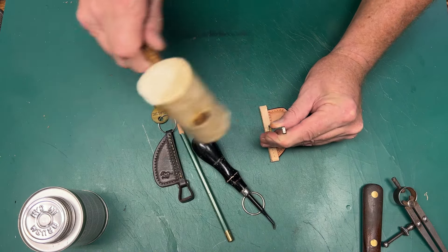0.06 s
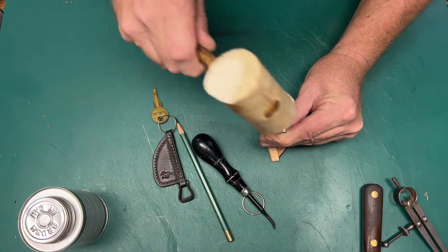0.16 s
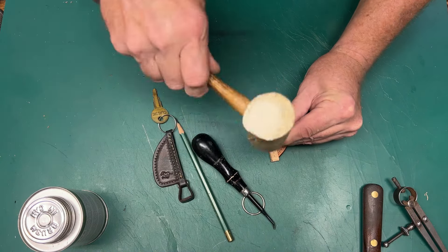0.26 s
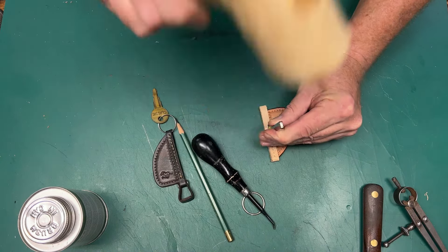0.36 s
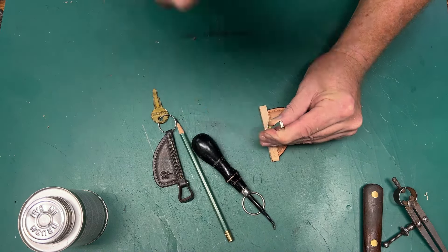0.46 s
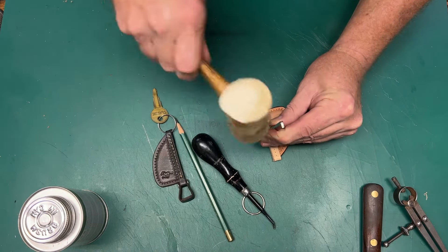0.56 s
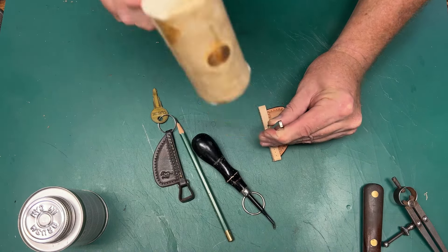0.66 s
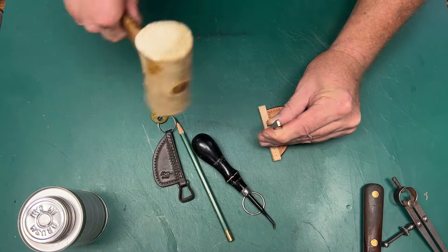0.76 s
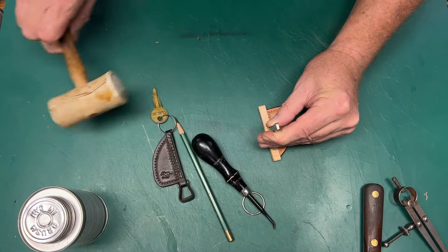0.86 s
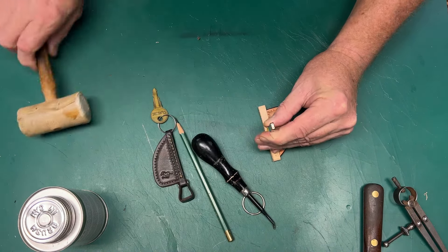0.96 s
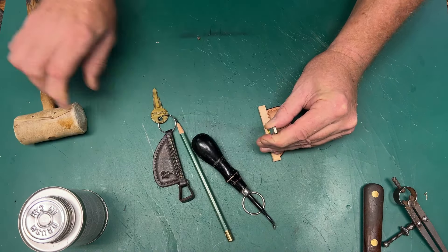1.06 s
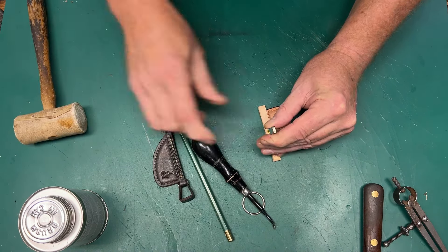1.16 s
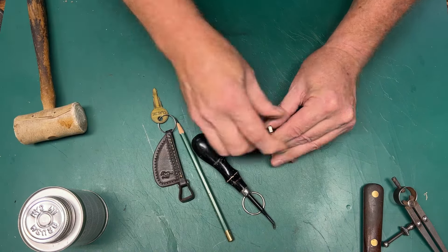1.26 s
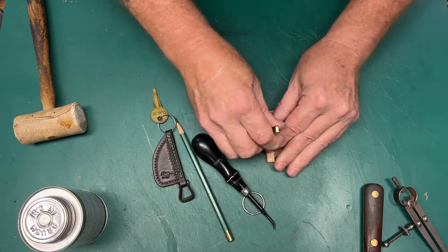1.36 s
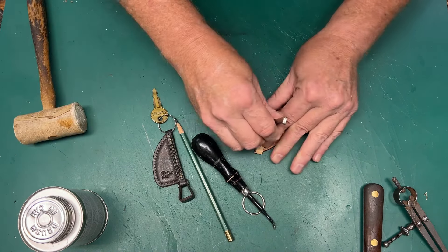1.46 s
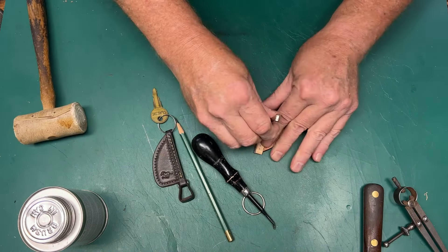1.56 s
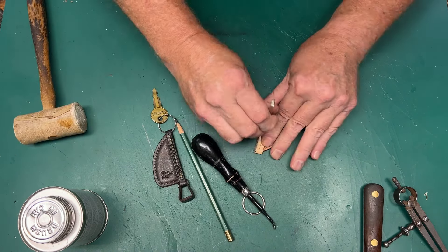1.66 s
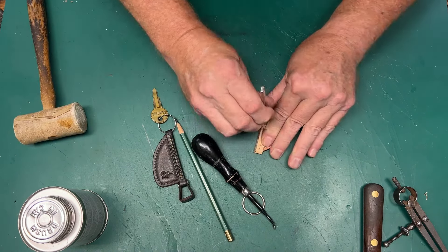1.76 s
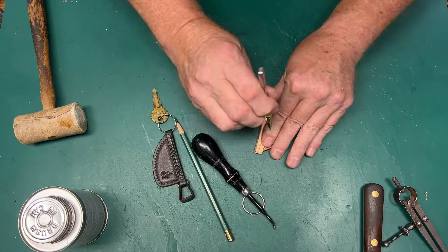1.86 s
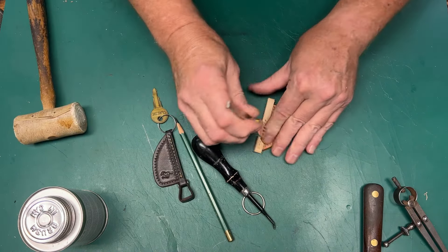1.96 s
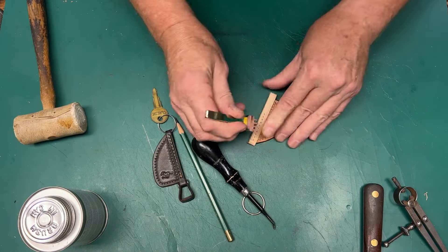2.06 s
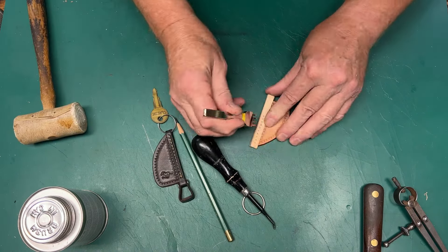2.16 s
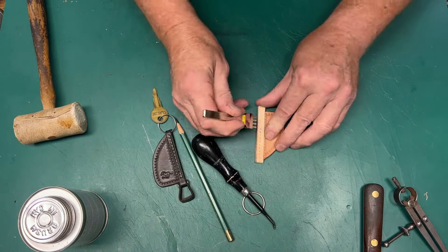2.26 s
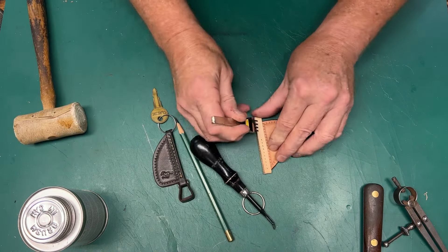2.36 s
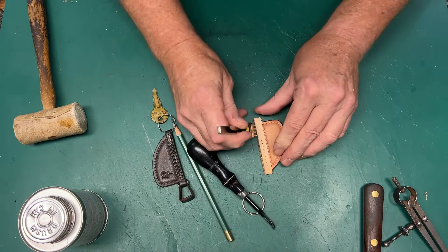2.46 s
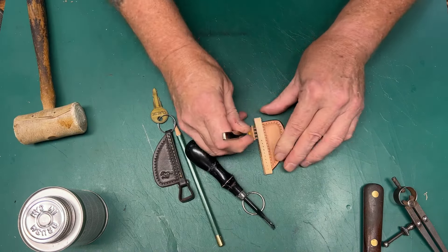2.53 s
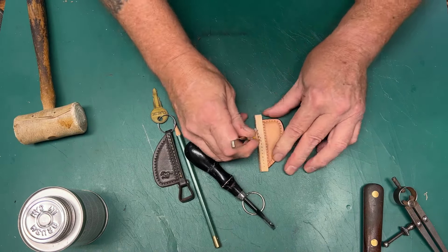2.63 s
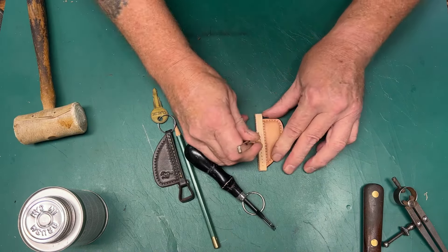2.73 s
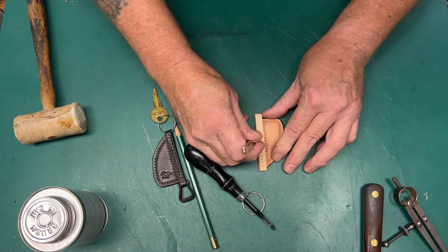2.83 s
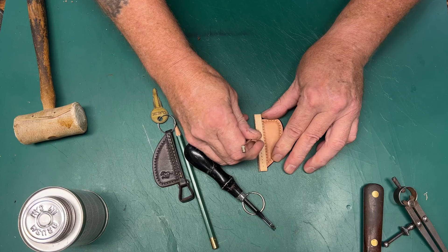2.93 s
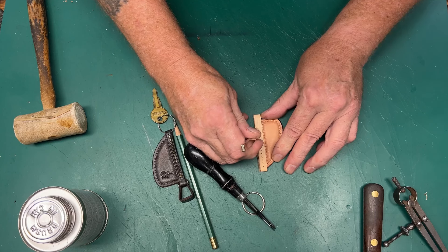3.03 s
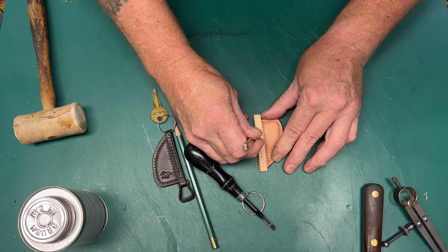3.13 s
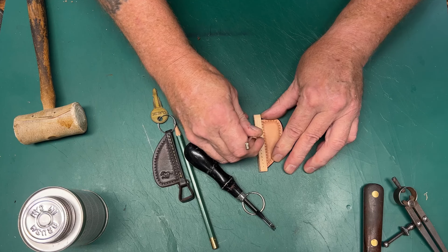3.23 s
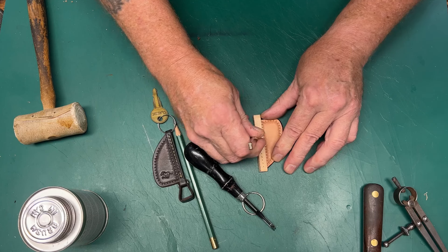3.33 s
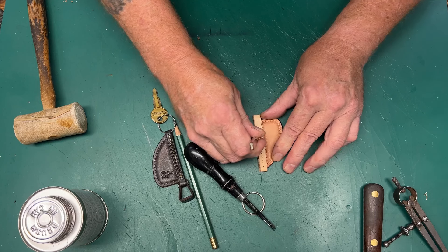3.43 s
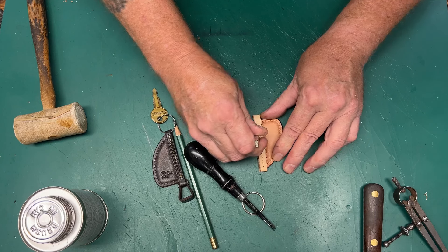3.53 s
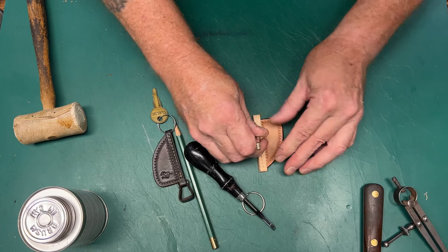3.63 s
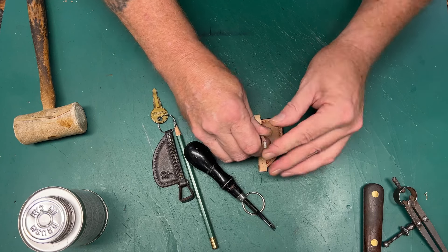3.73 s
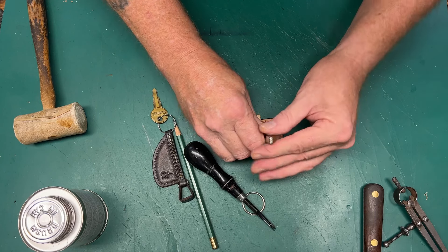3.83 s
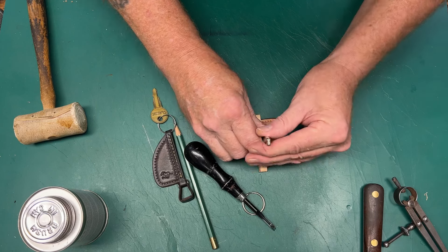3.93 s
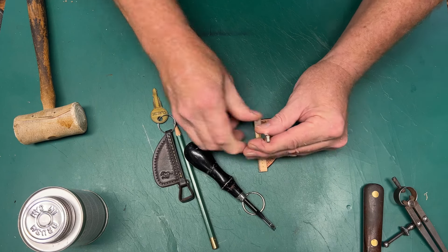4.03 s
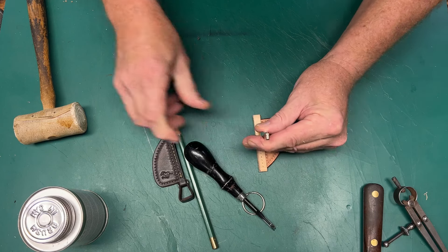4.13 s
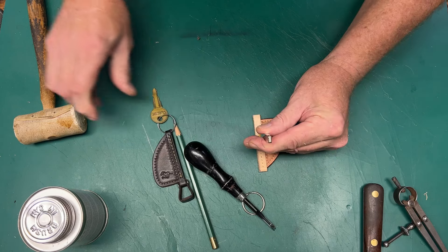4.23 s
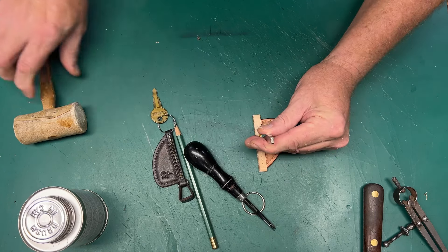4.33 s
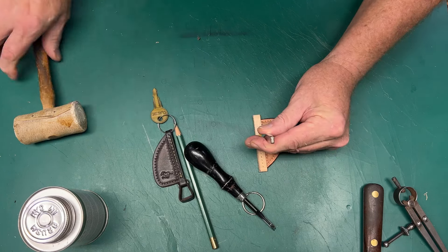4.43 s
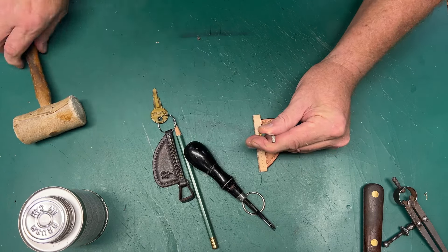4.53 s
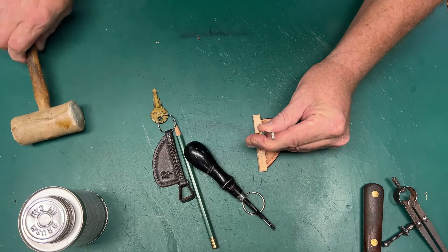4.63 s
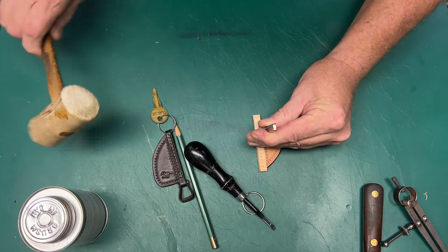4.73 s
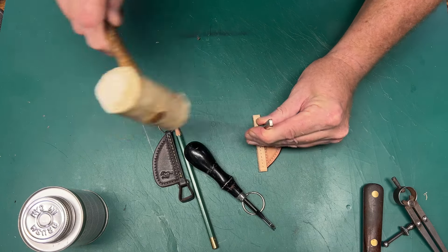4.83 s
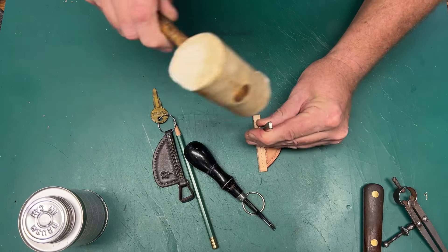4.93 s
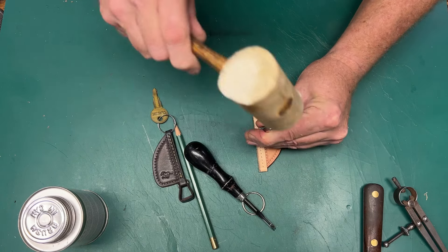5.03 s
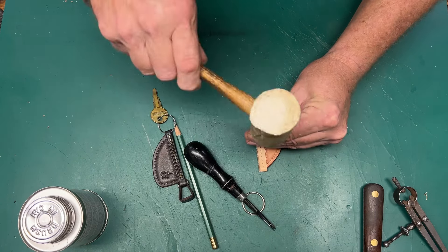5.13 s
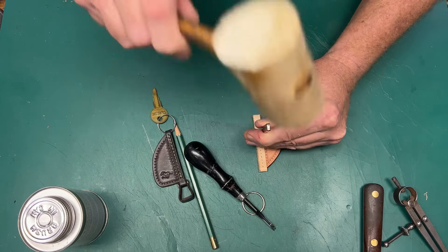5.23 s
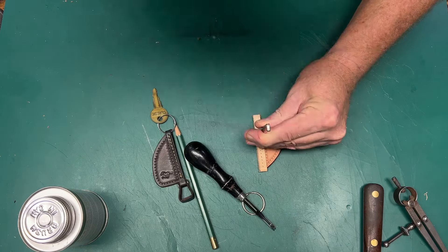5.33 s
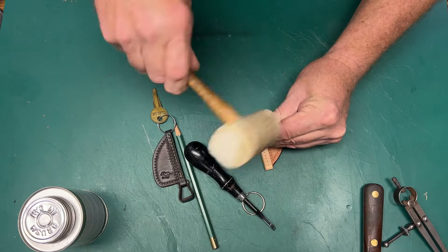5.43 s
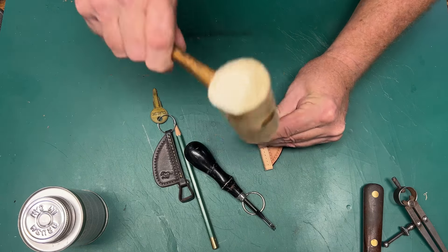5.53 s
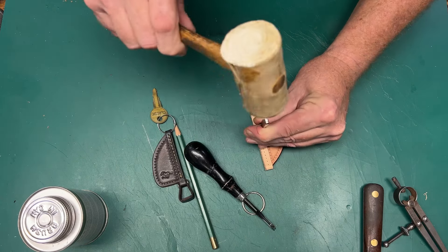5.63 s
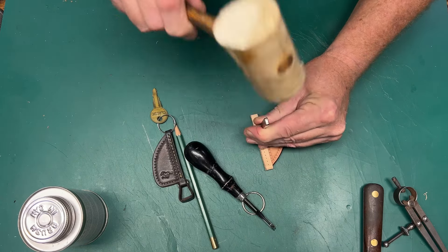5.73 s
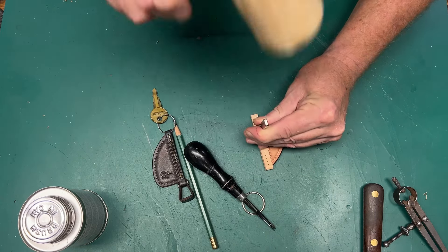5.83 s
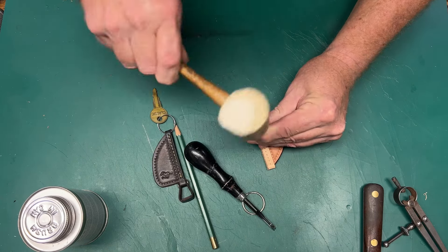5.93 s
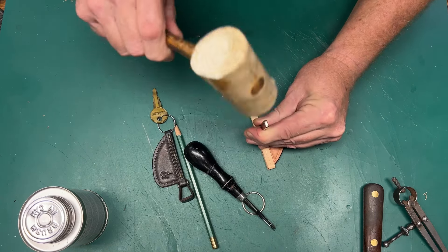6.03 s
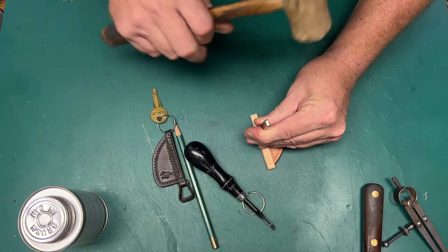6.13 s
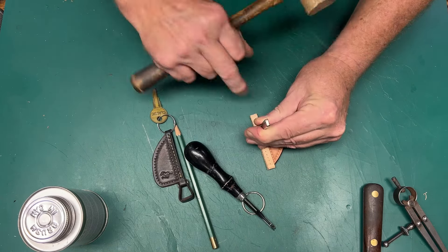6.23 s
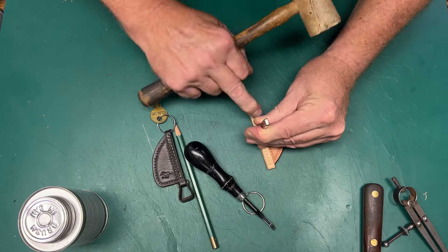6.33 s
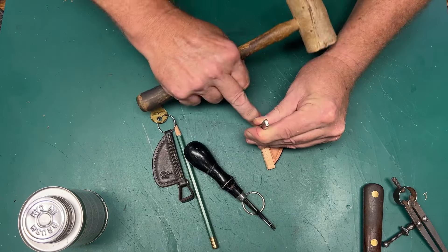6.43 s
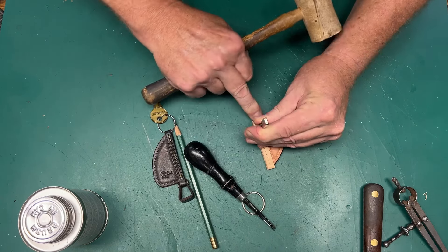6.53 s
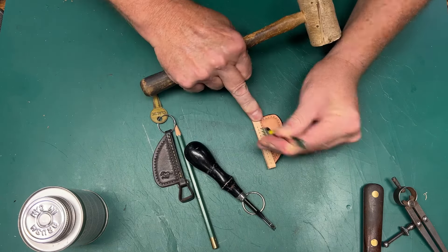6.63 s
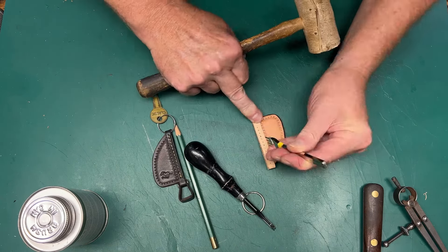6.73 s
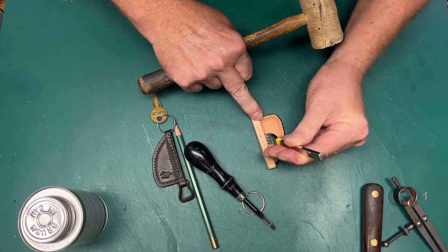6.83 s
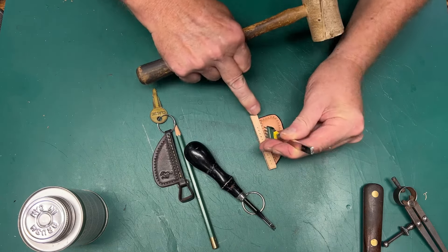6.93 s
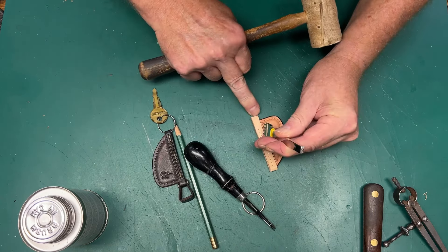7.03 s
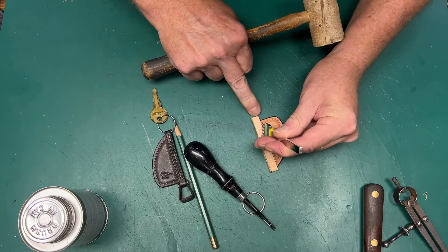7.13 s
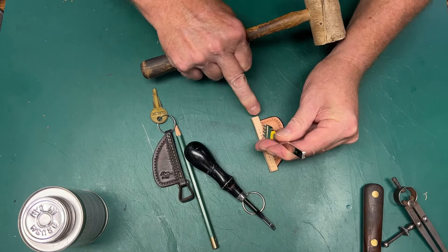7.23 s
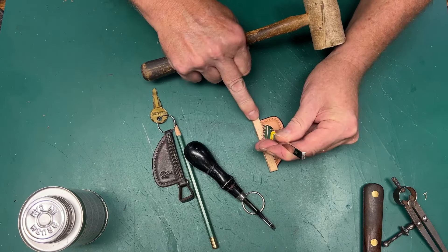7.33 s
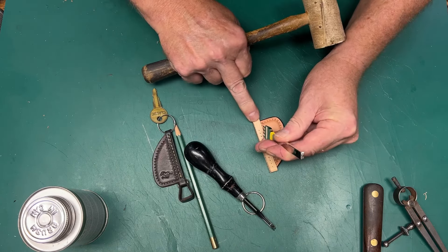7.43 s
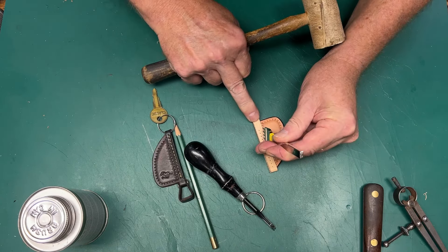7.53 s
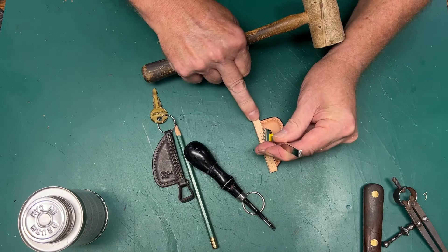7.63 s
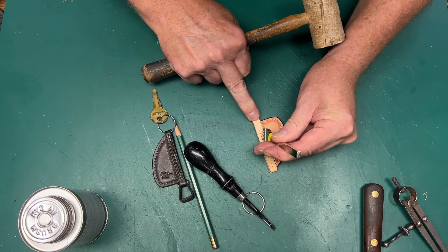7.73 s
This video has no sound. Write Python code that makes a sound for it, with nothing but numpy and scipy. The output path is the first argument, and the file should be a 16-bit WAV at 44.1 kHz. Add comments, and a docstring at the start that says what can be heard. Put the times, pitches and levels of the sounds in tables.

```python
"""Punching leather at the workbench

A close stereo microphone in a small room, over a low hum. A rawhide mallet drives a steel stitching
iron through leather: two knocks, the mallet clatters down on the left, fingers shift the leather and
reset the iron; three more knocks, and the iron is drawn out. Each knock rings mallet, iron and wooden
bench, and the hardest briefly push the microphone's limiter down."""
import sys
import numpy as np
from scipy import signal
from scipy.fft import rfft, irfft
from scipy.io import wavfile
from scipy.ndimage import uniform_filter1d, minimum_filter1d

SR = 44100
rng = np.random.default_rng(int(sys.argv[2]) if len(sys.argv) > 2 else 0)


def pcm_store(signal):
    """Save signal as 16-bit PCM."""
    levels = np.round(np.clip(np.atleast_2d(signal), -1, 1) * 32767)
    wavfile.write(sys.argv[1], SR, levels.astype(np.int16).T)


N = 343098
TIME, FREQS = np.arange(N) / SR, np.fft.rfftfreq(N, 1 / SR)
RING_TIME = np.arange(SR * 3 // 4) / SR

# Levels are relative, ahead of the mix gains.
# Mains hum of a distant motor. Each row: frequency in Hz, level in dB.
MOTOR_HUM = [(59.5, -64.5), (119.5, -57.5), (236, -75)]
# The room's decay. Each row: frequency in Hz, seconds to fall 60 dB.
ROOM_T60 = [(100, 0.9), (300, .55), (700, 0.5), (2000, 0.55), (5000, 0.45), (9000, 0.43), (15000, 0.21)]
# Strength of the reflections. Each row: frequency in Hz, level in dB.
ROOM_DB = [(60, -17), (200, -13.5), (400, -9), (800, -5.5), (1700, -9.5), (3000, -9), (6000, -6),
           (9000, -12.5), (14000, -15.5)]
# Diffuse sound at the microphone. Each row: frequency in Hz, left-right likeness from 0 to 1.
COHERENCE = [(60, 1), (250, 0.64), (600, 0.33), (1500, 0.24), (4000, .1), (16000, .05)]
# Spectra of noises and contacts. Each row: frequency in Hz, spectral density in dB.
AIR_SPECTRUM = [(20, -27), (40, -16), (60, 0.5), (80, -6), (100, -9.5), (125, -10.5), (160, -11),
                (210, -14.5), (400, -18), (1000, -28.5), (2000, -36.5), (4000, -49.5), (8000, -52),
                (16000, -70)]
RUMBLE_SPECTRUM = [(20, -26.5), (40, -13), (58, 2.5), (85, -8), (130, -13), (300, -23), (1000, -35.5),
                   (4000, -56)]
LEATHER_SPECTRUM = [(600, -33), (1400, 4.5), (3000, 1.5), (6000, 4.5), (9000, 4.5), (12000, -9), (16000, 1)]
GRIP_SPECTRUM = [(600, -26), (1200, -8), (2500, -8.5), (3500, 0), (4200, -4), (5100, -7.5), (5850, -1.5),
                 (7000, -10), (9000, -12), (12000, -27.5), (16000, -25)]
CLACK_SPECTRUM = [(80, -28.5), (200, -5), (400, -0.5), (850, -7), (1200, -2), (2200, -5), (3500, -8.5),
                  (5000, -13), (6000, -10.5), (9000, -18.5), (12000, -26.5), (16000, -33.5)]
SNAP_SPECTRUM = [(200, -16), (800, 1), (2500, 2.5), (4000, -1.5), (5500, -4.5), (7000, -8), (8700, -0.5),
                 (10500, -9.5), (12000, -9), (13500, -25.5), (15500, -18.5)]
CRACK_SPECTRUM = [(100, -23), (350, -0.5), (700, 1), (1100, -3.5), (1600, -2), (2500, -3), (4000, -15),
                  (5500, -15.5), (7000, -18.5), (9000, -22), (12000, -28.5), (13500, -38.5), (15500, -33)]
# Modes of the struck parts. Each row: frequency in Hz, level in dB, seconds to fall 60 dB.
BENCH_MODES = [(62, -19.5, 0.21), (88, -11.5, .12), (108.7, -21.5, 0.27), (134.9, -11.5, 0.19),
               (214.5, -26.5, .14), (229.9, -14.5, 0.17), (283.2, -19, 0.18), (334.7, -18.5, 0.3),
               (370, -21.5, 0.044), (496, -19.5, 0.14), (619, -16.5, .05), (680, -27, 0.028),
               (792, -26.5, 0.079)]
HEAD_MODES = [(1300, -9.5, 0.012), (1477, -9, 0.023), (1656, -5, .011), (1948, -7, .017), (2360, -16, .009)]
HANDLE_MODES = [(1206, -8, 0.058), (2670, -16.5, 0.12), (3405, -4.5, 0.051), (3645, -7, 0.0067),
                (4138, -3, 0.017), (5800, -1, .028)]
IRON_MODES = [(3250, -8, .02), (3620, -2, 0.012), (4470, -6.5, 0.009), (5760, -7.5, .009),
              (6900, -12, 0.0044)]
PUNCH_MODES = [(350, -4, 0.015), (466, 1, 0.014), (910, -14, 0.025)]  # the prongs punching down
# Hand movements. Each row: time of the peak in seconds, length in seconds, level in dB.
BENCH_LEANS = [(1.8, 1.77, -57.5), (3.5, 0.96, -59), (4.7, 1.3, -60), (6.66, 0.11, -54)]
LEATHER_SLIDES = [(1.44, .14, -69), (1.61, 0.048, -71.5), (1.74, 0.065, -69.5), (1.905, .07, -72),
                  (1.98, 0.094, -71), (2.265, 0.27, -63), (2.635, 0.13, -75), (4.02, .13, -76),
                  (6.12, .18, -69.5), (6.525, 0.093, -75)]  # on the mat or along the prongs
SKIN_RUBS = [(.025, .11, -72.5), (4.275, .08, -78), (4.466, .115, -52.5), (4.612, 0.08, -58.5),
             (4.77, .18, -71), (6.42, .045, -77), (6.835, .05, -78)]  # on handle and iron
# Ticks on the leather. Each row: start in seconds, level in dB, centre in Hz, width in octaves.
LEATHER_TICKS = [(1.279, -65, 6900, 1), (1.569, -65, 7000, 1), (1.607, -62, 4970, 1),
                 (1.7107, -58.5, 3000, 0.57), (1.743, -60, 3970, 1), (1.812, -65, 6000, 1),
                 (2.1122, -56.5, 5020, 1.9), (2.3986, -58.5, 2000, 0.6), (2.5455, -54.5, 1785, 0.34),
                 (3.3157, -61.5, 2500, 0.81), (3.452, -58, 6130, 2.8), (3.586, -53, 4500, 0.88),
                 (4.2579, -56.5, 5600, 0.77), (4.9368, -62.5, 6497, 0.39), (6.711, -82, 11000, .6),
                 (6.8513, -54, 1500, 0.8), (7.357, -70.5, 5000, .6)]
# The mallet laid down or picked up. Each row: start in seconds, bench thump in dB, its tilt in dB per
# octave, handle ring in dB, clack in dB, its tilt in dB per octave.
MALLET_CONTACTS = [(0.9299, -25, 7, -51, -20.5, -5.5), (0.9924, -29, 1.5, -51, -32.5, -4.5),
                   (0.9972, -19, -1, -35.5, -16.5, -4.5), (1.0303, -17, -0.5, -13.5, -13, 1),
                   (1.0849, -21.5, 1.5, -26.5, -26.5, 1), (4.459, -33.5, 0, -53, -45.5, 0.5),
                   (4.555, -45, 1.5, -67.5, -50.5, -3.5)]
# Mallet on iron. Each row: start in seconds, bench thump in dB, its tilt (hardness) in dB per octave,
# then punch, head, iron, snap and crack in dB, crack tilt in dB per octave, brief sub-bass thud in dB.
MALLET_BLOWS = [(0.2251, -2, -1, -3.5, -0.5, -22, -24, -17, -1, -58),
                (0.523, 1, -1, -3.5, 0.5, -17, -11, -3.5, -0.5, -28.5),
                (5.0968, -2.5, -1.5, -6, -0.5, -13.5, -24, -17.5, -1, -65),
                (5.4274, 0.5, -0.5, 4.5, 1, -12.5, -13, -3, -2.5, -28.5),
                (5.8935, -1, 0, 1.5, -1, -19.5, -14.5, -1.5, -2.5, -34.5)]


def amp(db):
    """Decibels to gain."""
    return 10 ** (np.asarray(db) / 20)


def unit_rms(x):
    """Scales to rms 1."""
    return x / np.sqrt(np.mean(x ** 2) + 1e-20)


def curve_at(points, hz):
    """Reads a curve on a log-frequency axis."""
    f, value = np.transpose(points)
    return np.interp(np.log(hz + 1), np.log(f + 1), value)


def add(mix, s, sound):
    """Mixes a sound in at s seconds."""
    part = mix[round(s * SR):][:len(sound)]
    part += sound[:len(part)]


def coloured(x, spectrum):
    """Gives noise a spectrum, at rms 1."""
    return unit_rms(irfft(rfft(x) * amp(curve_at(spectrum, FREQS)), N))


def drift(rate_hz):
    """A random wander of rms 1."""
    return unit_rms(np.interp(TIME * rate_hz, np.arange(4096), rng.standard_normal(4096)))


def strokes(rows, rise_share=.45, speed_power=1.4):
    """Level over time: each movement speeds up, then slows, and loudness is a power of its speed."""
    level = np.zeros(N)
    for s, length, db in rows:
        corners = [s - rise_share * length, s, s + (1 - rise_share) * length]
        speed = np.sin(np.pi / 2 * np.interp(TIME, corners, [0, 1, 0]))
        level += amp(db) * speed ** speed_power
    return level


def ring(modes, rise_cycles, lag_cycles=0, tilt_db=0, pivot_hz=170):
    """Modes swell and die away; neighbours swing in opposite senses, so their sum peaks late."""
    out = np.zeros(len(RING_TIME))
    for k, (hz, db, t60) in enumerate(modes):
        t = np.maximum(RING_TIME - lag_cycles / hz, 0)
        swell = 1 - np.exp(-t * hz / rise_cycles)
        fade = amp(db + tilt_db * np.log2(hz / pivot_hz) - 60 * t / t60)
        out -= (-1) ** k * fade * swell * np.sin(2 * np.pi * hz * t)
    return out


def burst(colour_db, t60, rise_s=0.00035, size=8192):
    """A contact scattered over a few milliseconds, with the spectrum colour_db(hz)."""
    t, hz = RING_TIME[:size], np.fft.rfftfreq(size, 1 / SR) + 1
    onset = 1 - np.exp(-t / rise_s)
    fade = amp(-60 * t / t60) * onset
    scatter = rfft(rng.standard_normal(size) * fade)
    contact = (irfft(scatter / abs(scatter) * amp(colour_db(hz))) * onset)[:size // 2]
    return contact * np.linalg.norm(fade) / np.linalg.norm(contact)


def diffuse_noise(size):
    """Noise reaching the microphone from all sides: left and right alike in bass, apart in treble."""
    left, unrelated = rfft(rng.standard_normal((2, size)))
    likeness = curve_at(COHERENCE, np.fft.rfftfreq(size, 1 / SR))
    right = likeness * left + np.sqrt(1 - likeness ** 2) * unrelated
    return irfft(np.array([left, right]), size)


def placed(x, left_db, shadow_hz, lag_s):
    """Direct sound: lag_s later on the right, and up to left_db louder on the left above shadow_hz."""
    shade = amp(left_db / 2 * FREQS / (FREQS + shadow_hz))
    delay = np.exp(-2j * np.pi * FREQS * lag_s)
    return irfft(rfft(x) * np.array([shade, delay / shade]), N)


def room_tone(air_db=-60.5, waver=.3, wander_rad=0.77):
    """Low steady room noise and the wavering hum of a distant motor."""
    tone = amp(air_db) * coloured(diffuse_noise(N), AIR_SPECTRUM)
    for hz, db in MOTOR_HUM:
        level = amp(db) * (1 + waver * drift(rate_hz=7))
        tone += level * np.sin(2 * np.pi * hz * TIME + wander_rad * drift(rate_hz=1.5))
    return tone


def reflections(feed, gap_s=0.0035, early_db=3, early_s=0.09):
    """Dense reflections off near walls, stronger at first; each band dies at its own speed."""
    hz, t, bands = signal.stft(diffuse_noise(SR), SR, nperseg=256)
    t60 = curve_at(ROOM_T60, hz)[:, None]
    fade = amp(curve_at(ROOM_DB, hz)[:, None] - 60 * t / t60 + early_db * np.exp(-t / early_s))
    equal_energy = np.sqrt(np.log(1e6) / (t60 * SR))
    tail = signal.istft(bands * fade * equal_energy, SR, nperseg=256)[1]
    tail *= 1 - np.exp(-(np.arange(tail.shape[1]) / SR / gap_s) ** 4)
    return signal.fftconvolve(feed[None], tail, axes=1)[:, :N]


def bench_rumble():
    """The bench stirs faintly under the pressing hands."""
    return strokes(BENCH_LEANS) * coloured(rng.standard_normal(N), RUMBLE_SPECTRUM)


def friction(rows, spectrum, gain_db, clump_db, grain_db=1.0):
    """Leather or skin sliding: dense tiny slips of uneven size, clumped under each stroke."""
    slips = rng.standard_normal(N) * (rng.random(N) < .2)
    slips *= amp(grain_db * np.minimum(rng.exponential(1, N), 4))
    slips *= amp(clump_db * drift(rate_hz=130))
    return amp(gain_db) * strokes(rows) * coloured(slips, spectrum)


def ticks(t60=0.021):
    """Prongs and fingernails tick on leather: small dead clicks, each with one broad spectral hump."""
    out = np.zeros(N)
    for s, db, centre_hz, octaves in LEATHER_TICKS:
        click = burst(lambda hz: -10 * np.log10(1 + (np.log2(hz / centre_hz) / octaves) ** 4), t60)
        add(out, s, amp(db) * click)
    return out


def iron_pull(start_s=6.603, length_s=0.028, slips_per_s=4000, scrape_db=-60.5,
              thump_s=6.62, thump_db=-38):
    """The prongs scrape out of the leather; the bench bumps as the load comes off."""
    slips, size = np.zeros(N), int(length_s * SR)
    grains = rng.standard_normal(size) * (rng.random(size) < slips_per_s / SR)
    add(slips, start_s, grains * np.hanning(size))
    out = amp(scrape_db) * np.sqrt(size / N) * coloured(slips, GRIP_SPECTRUM)
    add(out, thump_s, amp(thump_db) * ring(BENCH_MODES, rise_cycles=0.53, tilt_db=-1.5))
    return out


def mallet_clatter(clack_t60=0.025, handle_room_db=-9, clack_room_db=3):
    """Soft head, then hard handle, meet the bench and bounce. Returns close sound and room feed."""
    thump, handle, clack = np.zeros((3, N))
    for s, thump_db, hard_db, handle_db, clack_db, tilt_db in MALLET_CONTACTS:
        add(thump, s, amp(thump_db) * ring(BENCH_MODES, rise_cycles=.35, tilt_db=hard_db))
        add(handle, s, amp(handle_db) * ring(HANDLE_MODES, rise_cycles=.8))
        hit = burst(lambda hz: curve_at(CLACK_SPECTRUM, hz) + tilt_db * np.log2(hz / 1000), clack_t60)
        add(clack, s, amp(clack_db) * hit)
    return thump + handle + clack, thump + amp(handle_room_db) * handle + amp(clack_room_db) * clack


def crack(tilt_db, size=512):
    """The blow as sent out into the room in all directions: one pulse of set energy."""
    hz = np.fft.rfftfreq(size, 1 / SR) + 1
    colour_db = curve_at(CRACK_SPECTRUM, hz) + tilt_db * np.log2(hz / 1000)
    pulse = np.roll(irfft(amp(colour_db)), 64)
    return 8 * pulse / np.linalg.norm(pulse)


def mallet_knocks(snap_t60=0.013, knock_room_db=-10, iron_room_db=-6, thud_hz=24, thud_t60=.09):
    """Head snaps on iron, both ring, prongs punch, the bench booms. Returns close sound and room feed."""
    close, feed = np.zeros((2, N))
    for (s, thump_db, hard_db, punch_db, head_db, iron_db,
         snap_db, crack_db, tilt_db, thud_db) in MALLET_BLOWS:
        head = amp(head_db) * ring(HEAD_MODES, rise_cycles=0.94)
        punch = amp(punch_db) * ring(PUNCH_MODES, rise_cycles=0.59, lag_cycles=0.65)
        iron = amp(iron_db) * ring(IRON_MODES, rise_cycles=0.98)
        boom = amp(thump_db) * ring(BENCH_MODES, rise_cycles=0.98, tilt_db=hard_db)
        sub_thud = ring([(thud_hz, thud_db, thud_t60)], rise_cycles=.2)  # under the hardest knocks
        add(close, s, head + punch + iron + boom + sub_thud)
        add(close, s, amp(snap_db) * burst(lambda hz: curve_at(SNAP_SPECTRUM, hz), snap_t60))
        add(feed, s, amp(knock_room_db) * (head + punch) + amp(iron_room_db) * iron + boom)
        add(feed, s, amp(crack_db) * crack(tilt_db))
    return close, feed


def scene():
    """The work lies straight in front of the microphone; the mallet rests off to the left."""
    knocks, knocks_feed = mallet_knocks()
    clatter, clatter_feed = mallet_clatter()
    leather = friction(LEATHER_SLIDES, LEATHER_SPECTRUM, gain_db=0.5, clump_db=1.5)
    skin = friction(SKIN_RUBS, GRIP_SPECTRUM, gain_db=-4.0, clump_db=2.0)
    hands = ticks() + iron_pull() + leather + skin
    in_front = placed(knocks + hands, left_db=0.0, shadow_hz=2500, lag_s=2.8e-5)
    off_left = placed(clatter, left_db=10, shadow_hz=1500, lag_s=2.25e-4)
    room = reflections(amp(1.41) * knocks_feed + amp(-4.5) * clatter_feed + amp(-1.0) * hands)
    balance = amp([[.45], [-.45]])  # the left channel is a touch louder
    return (in_front + off_left + room + room_tone() + bench_rumble()) * balance


def record(dry, low_cut_hz=38, ceiling_db=-.5, recover_db_per_s=1800, top_hz=16500):
    """The microphone's chain: low cut, a fast peak limiter on the hardest knocks, then a band limit."""
    dry = signal.sosfilt(signal.butter(2, low_cut_hz, "highpass", fs=SR, output="sos"), dry)
    over_db = np.maximum(20 * np.log10(abs(dry).max(0) + 1e-9) - ceiling_db, 0)
    recovery_db = TIME * recover_db_per_s
    cut_db = np.maximum.accumulate(over_db + recovery_db) - recovery_db
    gain = amp(uniform_filter1d(minimum_filter1d(-cut_db, size=31), size=31))  # dips ahead of a peak
    lowpass = signal.firwin(511, top_hz, window=("kaiser", 9), fs=SR)
    return signal.oaconvolve(dry * gain, lowpass[None], "same")


dry = scene()
out = record(dry)
pcm_store(out)
```